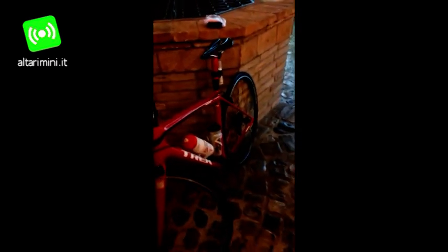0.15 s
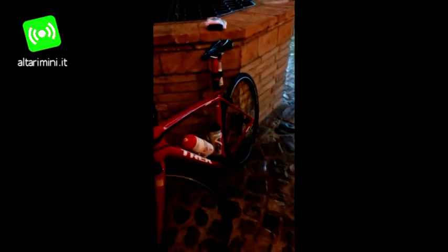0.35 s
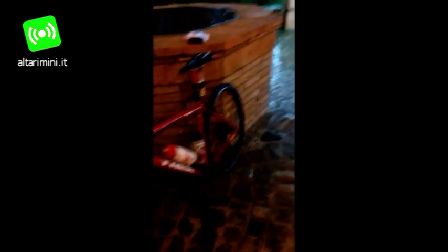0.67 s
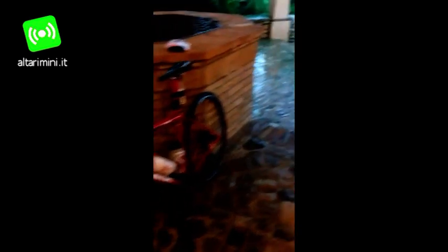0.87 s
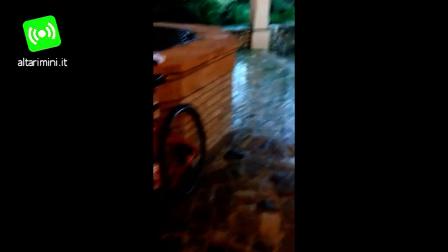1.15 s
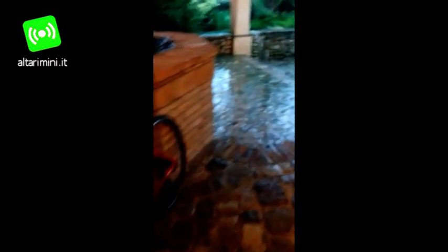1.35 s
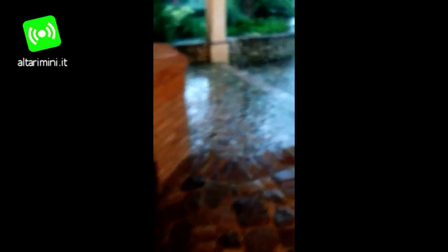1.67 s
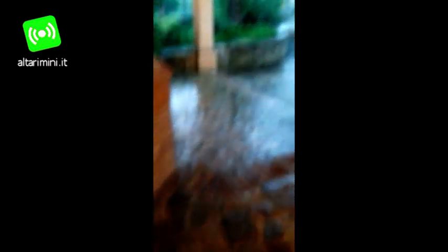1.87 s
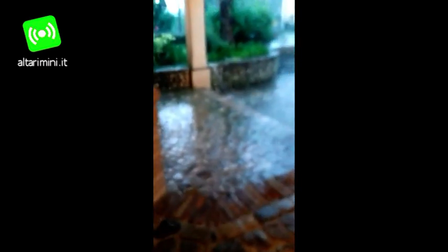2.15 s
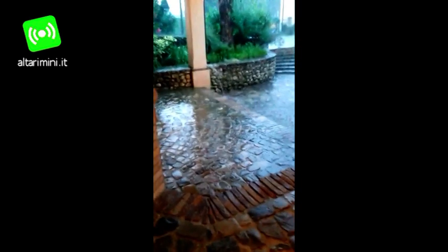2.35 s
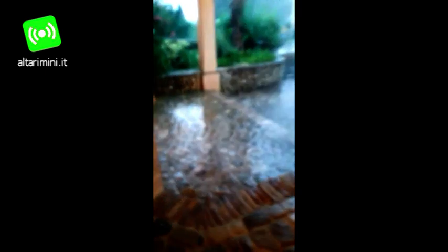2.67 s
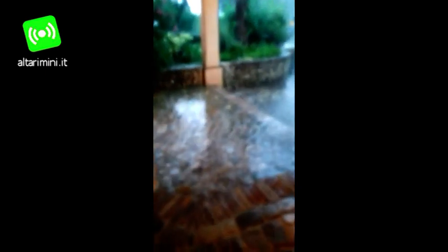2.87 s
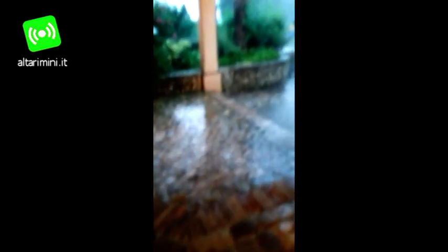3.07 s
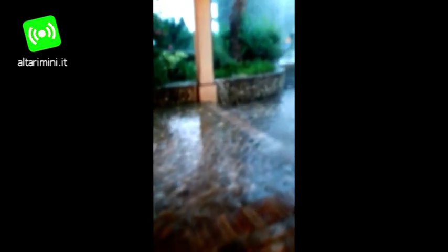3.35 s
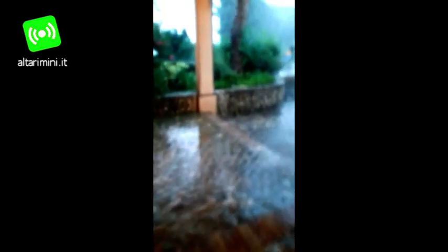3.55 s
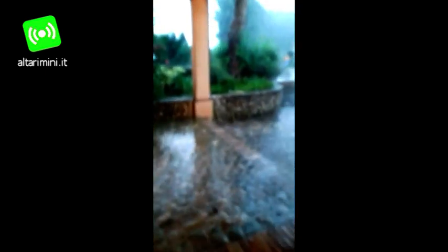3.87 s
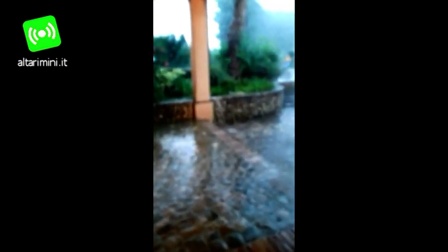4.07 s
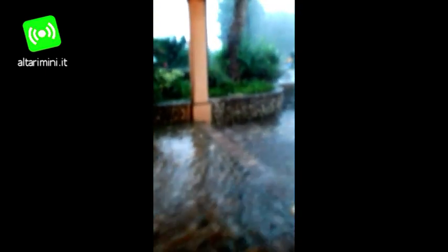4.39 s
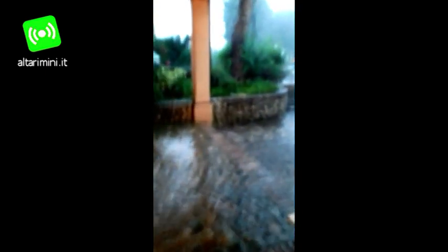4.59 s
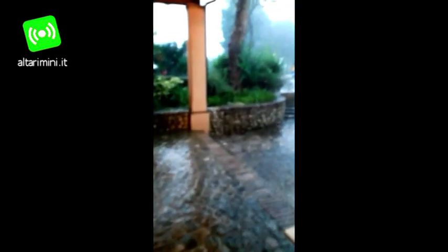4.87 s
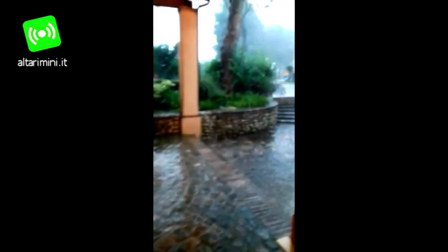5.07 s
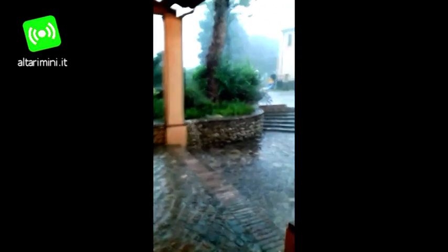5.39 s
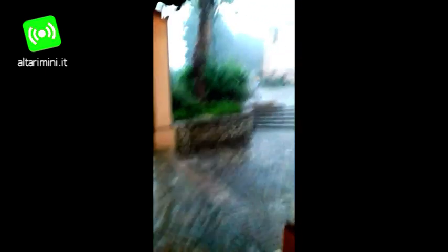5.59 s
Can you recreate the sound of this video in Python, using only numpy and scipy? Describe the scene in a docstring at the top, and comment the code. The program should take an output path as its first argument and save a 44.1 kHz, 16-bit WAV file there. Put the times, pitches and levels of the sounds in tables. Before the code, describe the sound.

Continuous hail and heavy rain batter cobbles outdoors. An opening burst of sharp nearby cracks and a bright water slap gives way to steady rattling; a lower gush falls near one and a half seconds. Scattered stones snap around two, three and four seconds, with small flurries to the end. Faint low roof drumming sits underneath, caught by one small, peaky microphone under cover.

```python
"""Hailstones clatter on wet paving in flurries, and now and then one lands close by and shatters: a violent
hailstorm heard from under a porch through one small microphone. Fine spray, two gushes of water, the wash of
the downpour over the courtyard and a drumming roof complete it. Random impulses excite resonators
(hail, spray, gushes, close stones) or, where drops merge, are shaped by a spectrum (wash, roof)."""
import sys
import numpy as np
from scipy import signal
from scipy.fft import rfft, irfft, next_fast_len
from scipy.io import wavfile

SR = 44100
rng = np.random.default_rng(int(sys.argv[2]) if len(sys.argv) > 2 else 0)


def master_out(mix):
    """Clip the mix to full scale and print it as 16-bit PCM to the path in sys.argv[1]."""
    frames = np.transpose(np.atleast_2d(mix))
    ceiling = np.clip(frames, -1, 1)
    pcm = np.round(ceiling * 32767).astype(np.int16)
    wavfile.write(sys.argv[1], SR, pcm)


N = 252693  # length in samples

# Strength of the downpour, relative levels: time_s, wash_db, spray_db
DOWNPOUR_CURVE = [(0, -35.5, -35), (.7, -36, -35.6), (1.2, -36, -35.8), (1.33, -34.5, -35),
                  (2.0, -34, -34.5), (2.35, -33, -33.5), (3.05, -34, -34.3), (3.8, -34.5, -34.5),
                  (4.15, -34, -36.5), (4.9, -34.5, -34), (5.73, -32.5, -36.5)]
# Stones landing close by, relative levels: start_s, clack_db, crack_db
CLOSE_STONES = [(0.0606, -1, -35), (0.0934, -3, -35), (0.2894, -5, -29), (0.3774, -9, -32),
                (0.6936, -3, -31), (0.7174, -4, -33), (0.7737, -7, -22.5), (0.8069, -18, -26),
                (0.83, -5, -27), (1.8204, -6, -26), (1.9113, -8, -27), (2.985, -14, -33), (3.0037, -8, -31),
                (3.2614, -13, -30), (3.2784, -10, -28), (4.031, -1, -37), (4.4184, -8, -30)]
# Resonances of a close stone's clack, its crack and its chips: pitch_hz, relative level_db, t60_s
CLACK_RESONANCES = [(2700, -12, 0.013), (3620, -10, 0.024), (4400, -2, 0.0073)]
CRACK_RESONANCES = [(6200, 1, 0.0048), (7800, 0, 0.0033)]
CHIP_RESONANCES = [(11500, 0, 0.0022), (13500, 0, .002)]
# Spectra of the roof and of the courtyard wash: frequency_hz, relative level_db
ROOF_SPECTRUM = [(20, -32), (40, -22), (62, -13), (95, -6.5), (130, 1), (170, -0.5), (250, -0.5),
                 (330, -4.5), (480, -9.5), (800, -13), (2000, -42)]
WASH_SPECTRUM = [(30, -42), (100, -17), (400, -8.5), (800, -8), (1200, -5), (1800, -3), (2500, -3.5),
                 (3300, -1), (4500, -3), (6000, -12.5), (9000, -18), (15000, -34)]
# Loudness of hail clicks and of spray ticks by their pitch: pitch_hz, relative level_db
CLATTER_SPECTRUM = [(1300, -20.5), (2200, -5.5), (3200, -3), (4000, 0.5), (4800, -4), (6000, -15.5),
                    (7500, -40)]
SPRAY_SPECTRUM = [(5500, 5.5), (7000, -6.5), (8700, -5), (11500, 0), (13000, -3.5), (14500, -18)]
# Hail drumming on the roof: time_s, relative level_db
DRUMMING_CURVE = [(0, -39), (2.25, -40), (2.85, -38), (3.05, -35.5), (3.7, -36.5), (4.18, -36), (4.3, -37),
                  (5.73, -38.5)]
# Gushes of water slapping the paving: start_s, level_db, pitch_hz, t60_s
WATER_GUSHES = [(0.060, -21.5, 3700, .4), (1.476, -24.5, 2070, 0.64)]
# Flurries of hail: start_s, rise_db of the clatter, hold_s
HAIL_FLURRIES = [(0.038, 1.5, .1), (0.952, 1.4, 0.079), (1.242, 2, 0.039), (1.535, 1.5, 0.085),
                 (1.775, 0.8, .03), (2.95, 1, 0.12), (3.206, 0.9, 0.065), (3.405, 1.1, 0.073),
                 (4.006, 1.1, .05), (4.41, 1.5, 0.07), (4.73, 2, .16), (5.07, 1.4, 0.13),
                 (5.47, 0.9, 0.067)]

# Steady hail: mean level in dB, and its share of the downpour's swing in dB
HAIL_DB, HAIL_FOLLOWS = -25.5, 0.5
FLURRY_ATTACK_S, FLURRY_RELEASE_S = 0.02, 0.05
SPRAY_FOLLOWS = 0.15  # share of a flurry's rise that shows in the spray
PORT_HZ, PORT_WIDTH_HZ, PORT_DB = 4090, 970, 5.5
NULL_HZ, NULL_WIDTH_HZ, NULL_DB = 10000, 520, -6
PEAK_CEILING = 0.56  # amplitude that rounded peaks approach
CUTOFF_HZ = 14950


def from_db(db):
    """Level to amplitude: 20 dB is a factor of ten."""
    return 10 ** (np.asarray(db) / 20)


def rms_one(x):
    """Normalisation to unit root-mean-square amplitude."""
    return x / np.sqrt(np.mean(x ** 2) + 1e-20)


def in_time(rows):
    """Linear interpolation of each column of a time table, sample by sample."""
    time_s, *columns = np.transpose(rows)
    t = np.arange(N) / SR
    return [np.interp(t, time_s, column) for column in columns]


def at_hz(points, hz):
    """Interpolation of a spectrum's level on a log-frequency axis."""
    known_hz, level_db = np.transpose(points)
    return np.interp(np.log(np.maximum(hz, 1)), np.log(known_hz), level_db)


def coloured(x, spectrum):
    """Spectral shaping: each frequency is weighted by the given spectrum; rms 1."""
    size = next_fast_len(N)
    gain = from_db(at_hz(spectrum, np.fft.rfftfreq(size, 1 / SR)))
    return rms_one(irfft(rfft(x, size) * gain, size)[:N])


def drift(rate_hz):
    """Low-passed noise: slow chance with spread 1, changing about rate_hz times a second."""
    step = 40  # samples between computed values
    pole = np.exp(-2 * np.pi * rate_hz * step / SR)
    noise = rng.standard_normal(N // step + 2002)
    slow = signal.lfilter([1], [1, -2 * pole, pole * pole], noise)[2000:]  # start-up discarded
    return np.interp(np.arange(N) / step, np.arange(len(slow)), rms_one(slow))


def ring(clicks, hz, t60_s):
    """Damped free vibration: a unit click starts a decaying sine of height about 1."""
    decay = from_db(-60 / (t60_s * SR))
    angle = 2 * np.pi * hz / SR
    feedback = [1, -2 * decay * np.cos(angle), decay * decay]
    return signal.lfilter([0, np.sin(angle)], feedback, clicks + 1e-18)


def resonance(x, hz, width_hz):
    """Forced resonance: a band-pass with gain 1 at its peak."""
    hz_safe, width_safe = min(hz, 0.45 * SR), min(width_hz, 0.2 * SR)
    b, a = signal.iirpeak(hz_safe, hz / width_safe, fs=SR)
    return signal.lfilter(b, a, x + 1e-18)


def impacts(per_s, spread_db):
    """Random impulse train: clicks at chance moments, many small and a few large."""
    size_db = spread_db * np.minimum(rng.exponential(1, N), 4.5)
    sizes = from_db(size_db) * rng.choice([-1, 1], N)
    return sizes * (rng.random(N) < per_s / SR)


def pitched(clicks, spectrum, sharpness, count):
    """Resonator bank: every impact rings for a few cycles at one of count pitches; rms 1."""
    pitches = np.geomspace(spectrum[0][0], spectrum[-1][0], count)
    dealt = rng.integers(0, count, N)
    total = np.zeros(N)
    for k, hz in enumerate(pitches):
        band = resonance(clicks * (dealt == k), hz, hz / sharpness)
        total += from_db(at_hz(spectrum, hz)) * rms_one(band)
    return rms_one(total)


def porch(x, wet_db, t60_s):
    """Diffuse reverberation: impacts land in different places, so a noisy tail follows their energy."""
    keep = from_db(-120 / (t60_s * SR))  # energy falls 60 dB in t60_s
    energy = signal.lfilter([1 - keep], [1, -keep], x ** 2 + 1e-18)
    return x + from_db(wet_db) * np.sqrt(energy) * rng.standard_normal(N)


def flurries():
    """Envelope principle: each flurry raises the hail in dB, quickly, then holds and dies away."""
    t, total_db = np.arange(N) / SR, np.zeros(N)
    for start_s, rise_db, hold_s in HAIL_FLURRIES:
        attack = np.clip((t - start_s) / FLURRY_ATTACK_S, 0, 1)
        since_hold = np.maximum(t - start_s - FLURRY_ATTACK_S - hold_s, 0)
        total_db += rise_db * attack * np.exp(-since_hold / FLURRY_RELEASE_S)
    return total_db


def hail_level(wash_db, flurry_db, waver_db):
    """Superposed levels: hail follows the downpour, swells in flurries and wavers by chance."""
    swing_db = HAIL_FOLLOWS * (wash_db - np.mean(wash_db))
    return HAIL_DB + swing_db + flurry_db + waver_db * drift(8)


def clatter(hail_db):
    """Impact excitation of stone by hail: the harder it falls, the more stones land."""
    per_s = 13000 * from_db(hail_db - np.mean(hail_db))
    clicks = porch(impacts(per_s, spread_db=1.3), wet_db=-2.5, t60_s=0.35)
    return from_db(hail_db) * pitched(clicks, CLATTER_SPECTRUM, sharpness=6.2, count=24)


def close_stones(clack_db, crack_db, chip_db, shatter_db, shatter_s):
    """Modal vibration: a stone clacks, cracks and sheds chips; its pieces strike a moment later."""
    start_s, clacks, cracks = np.transpose(CLOSE_STONES)
    count = len(start_s)
    first = np.round(start_s * SR).astype(int)
    again = first + (shatter_s * SR * rng.uniform(0.55, 2.2, count)).astype(int)
    parts = (
        (CLACK_RESONANCES, clacks + clack_db),
        (CRACK_RESONANCES, cracks + crack_db),
        (CHIP_RESONANCES, cracks + chip_db),
    )
    out = np.zeros(N)
    for modes, levels_db in parts:
        for hz, mode_db, t60_s in modes:
            clicks = np.zeros(N)
            clicks[first] = from_db(levels_db + mode_db) * rng.choice([-1, 1], count)
            clicks[again] += clicks[first] * from_db(shatter_db)
            out += ring(porch(clicks, wet_db=-1.5, t60_s=0.12), hz, t60_s)
    return out


def spray(clump_db):
    """Short high resonances: splashes and ice chips give tiny bright ticks, in clumps."""
    clicks = porch(impacts(per_s=4200, spread_db=0.0), wet_db=-4.0, t60_s=0.2)
    ticks = pitched(clicks, SPRAY_SPECTRUM, sharpness=4.7, count=18)
    band = signal.butter(2, [5000, 14500], "band", fs=SR, output="sos")
    ticks = signal.sosfilt(band, ticks)
    return rms_one(ticks) * from_db(clump_db * drift(40))


def gushes(width_hz):
    """Exponential decay: a slug of water breaks into a quickly fading shower of drops around one pitch."""
    t, out = np.arange(N) / SR, np.zeros(N)
    for start_s, level_db, hz, t60_s in WATER_GUSHES:
        drops = impacts(per_s=2300, spread_db=1.5)
        for _ in range(2):  # two passes steepen the band's skirts
            drops = resonance(drops, hz, width_hz)
        fading_db = level_db - 60 * np.maximum(t - start_s, 0) / t60_s
        out += rms_one(drops) * (t > start_s) * from_db(fading_db)
    return out


def wash():
    """Shot noise: rain over the courtyard, too dense for single drops to stand out."""
    return coloured(impacts(per_s=16000, spread_db=2.0), WASH_SPECTRUM)


def roof():
    """Shot noise: countless dull blows on the roof merge into a low drumming."""
    return coloured(impacts(per_s=6000, spread_db=1.5), ROOF_SPECTRUM)


def scene():
    """Superposition: near hail, stones, spray and gushes over courtyard and roof; equal channels."""
    wash_db, spray_db = in_time(DOWNPOUR_CURVE)
    roof_db, = in_time(DRUMMING_CURVE)
    flurry_db = flurries()
    hail = clatter(hail_level(wash_db, flurry_db, waver_db=0.35))
    stones = close_stones(clack_db=-11.5, crack_db=5.5, chip_db=0.0, shatter_db=-3.0, shatter_s=0.0013)
    splashes = from_db(spray_db + SPRAY_FOLLOWS * flurry_db - 1.0) * spray(clump_db=1.0)
    water = gushes(width_hz=1100)
    far = from_db(wash_db + 8.5) * wash() + from_db(roof_db + 1.25) * roof()
    return np.tile(hail + stones + splashes + water + far, (2, 1))


def record(dry):
    """Microphone response: port resonance, a narrow null above it, rounded peaks and a cut top."""
    x = dry + (from_db(PORT_DB) - 1) * resonance(dry, PORT_HZ, PORT_WIDTH_HZ)
    x = x + (from_db(NULL_DB) - 1) * resonance(x, NULL_HZ, NULL_WIDTH_HZ)
    rounded = x / (1 + (x / PEAK_CEILING) ** 8) ** (1 / 8)
    low_pass = signal.ellip(12, 0.2, 80, CUTOFF_HZ, fs=SR, output="sos")
    return signal.sosfilt(low_pass, rounded)


dry = scene()
out = record(dry)
master_out(out)
```